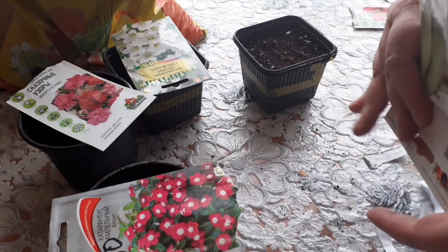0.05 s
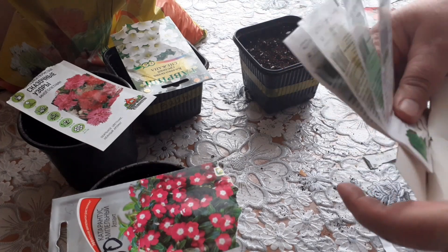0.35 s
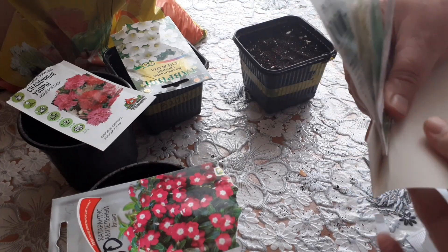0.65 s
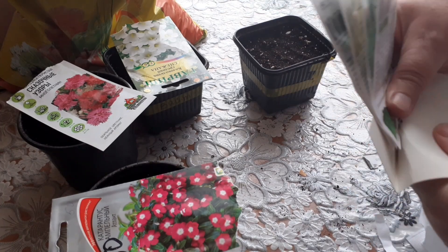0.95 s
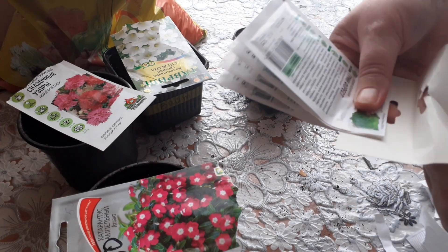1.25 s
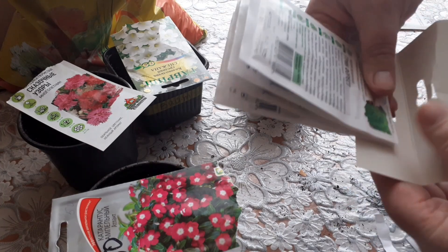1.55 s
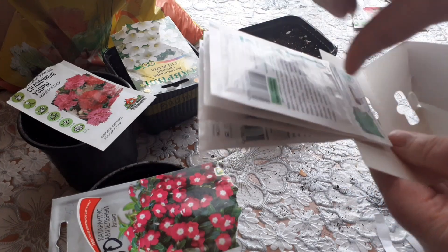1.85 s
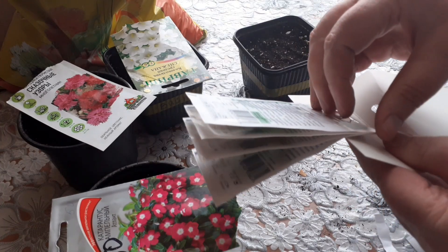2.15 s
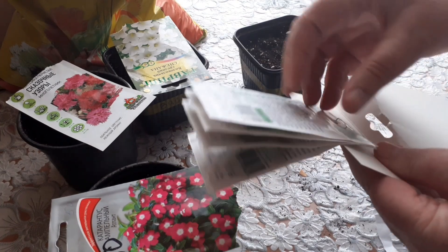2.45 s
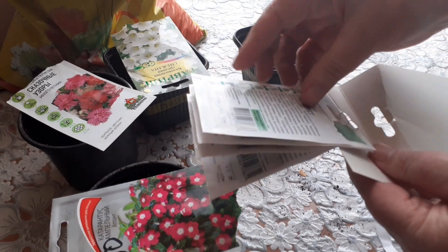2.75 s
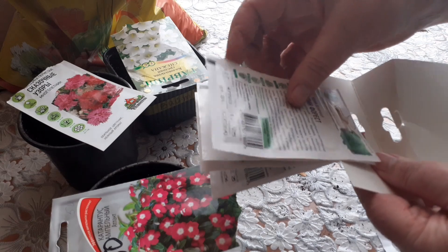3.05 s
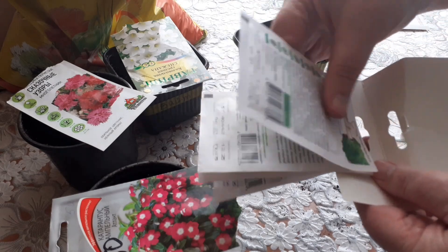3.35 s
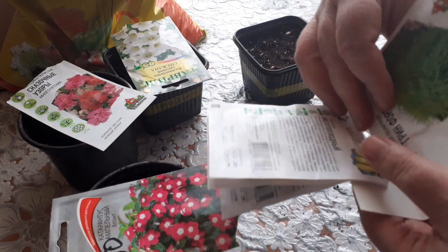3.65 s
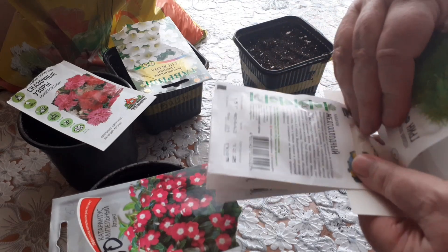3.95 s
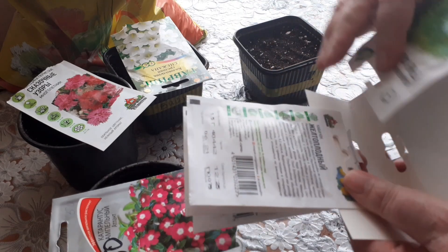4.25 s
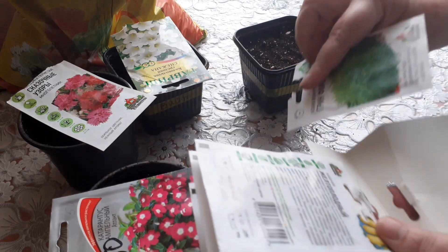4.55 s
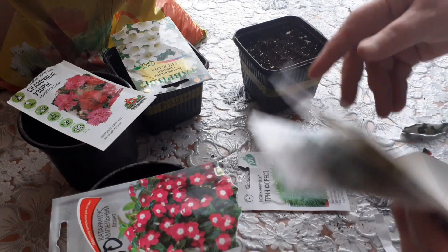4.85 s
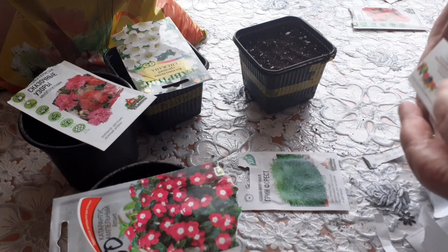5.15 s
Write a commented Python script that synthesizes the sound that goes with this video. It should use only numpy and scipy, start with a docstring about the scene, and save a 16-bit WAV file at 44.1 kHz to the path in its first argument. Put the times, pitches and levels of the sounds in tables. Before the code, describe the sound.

Paper seed packets are handled close to a stereo microphone over a table in a small room. They scuff and crackle from the start, and their stiff card sleeve pops at about 0.3 seconds, skips on its edge in a quick fading row of ticks, and snaps sharply at 0.5. A loud double crack comes at 1.1 seconds. From there to about 3 seconds the leafing is quiet, with faint sliding, small wrinkle ticks and a light snap near 2.4. Crackling and rustling thicken from 3 seconds, peaking around 3.5, and a strong scuff with a card knock lands just after 4. A faint low drone swells and sinks around that moment. Softer brushes and a few ticks continue until the end at about 5.3 seconds. The sharper sounds ring briefly off the near walls, over very faint room air.

```python
"""Paper slides and scuffs close to a stereo microphone: seed packets, handled over a table in a small room.
A stack is worked out of its card sleeve and leafed through. Fibres catch and hiss, wrinkles tick,
creases snap, and the stiff card pops, knocks and skips along on its edge. The table with its plastic
pots and the near walls ring briefly; behind them lie faint room air and a low drone that swells once."""
import sys
import numpy as np
from scipy import signal
from scipy.fft import rfft, irfft, next_fast_len
from scipy.io import wavfile
from scipy.ndimage import map_coordinates

SR = 44100
rng = np.random.default_rng(int(sys.argv[2]) if len(sys.argv) > 2 else 0)


def file_out(sig):
    """Save sig as 16-bit WAV at sys.argv[1]."""
    # one column per channel
    cols = np.atleast_2d(sig).T
    # limit, then scale
    lim = np.clip(cols, -1, 1)
    pcm = np.round(lim * 32767).astype(np.int16)
    wavfile.write(sys.argv[1], SR, pcm)


N = 233553


def amp(db):
    """Decibels to gain."""
    return 10 ** (np.asarray(db) / 20)


def unit(x):
    """Scaled to rms 1."""
    return x / np.sqrt(np.mean(x ** 2) + 1e-20)


def along(points, hz):
    """Interpolate (freq_hz, value) points on a log axis."""
    f, v = np.transpose(points)
    return np.interp(np.log(hz + 1), np.log(f + 1), v)


def hump(hz, centre_hz, octaves):
    """A resonance of height 1."""
    return np.exp(-(np.log2((hz + 1) / centre_hz) / octaves) ** 2)


def wobble(rate, size):
    """A smooth random curve, rate knots a second."""
    knots = rng.standard_normal(int(size * rate / SR) + 4)
    return map_coordinates(knots, [np.arange(size) * rate / SR])


def filtered(x, response):
    """Shape x by a gain that depends on frequency."""
    size = x.shape[-1]
    m = next_fast_len(size + 4096)
    return irfft(rfft(x, m) * response(np.fft.rfftfreq(m, 1 / SR)), m)[..., :size]


def ring(hz, t60):
    """One damped mode, falling 60 dB in t60 seconds."""
    t = np.arange(SR // 2) / SR
    return np.sin(2 * np.pi * hz * t) * amp(-60 * t / t60)


def place(sound, left_db):
    """Make a sound left_db louder at the left microphone than at the right."""
    return sound * amp([[left_db / 2], [-left_db / 2]])


def add(track, sound, start_s):
    """Mix a sound into the track from start_s on."""
    start = round(start_s * SR)
    part = sound[..., max(-start, 0):N - start]
    track[..., max(start, 0):max(start, 0) + part.shape[-1]] += part


# How alike the left and right microphones sound: freq_hz, correlation
MIC_LIKENESS = [(300, 0.89), (800, 0.47), (2000, 0.11), (4000, 0), (9000, .1), (14000, 0.055)]
def noise(colour, size):
    """Stereo noise of rms 1 with a colour in dB; the microphones share most of its bass."""
    def mid_side_gains(hz):
        angle = np.arccos(along(MIC_LIKENESS, hz)) / 2
        return amp(colour(hz)) * [np.cos(angle), np.sin(angle)]
    mid, side = filtered(rng.standard_normal((2, size)), mid_side_gains)
    return unit(np.array([mid + side, mid - side]))


def catching(size, grain_db, clump_db):
    """Paper fibres catch and let go: tiny grains that come in clumps."""
    return unit(amp(grain_db * wobble(1100, size) + clump_db * wobble(120, size)))


# Rubbed paper, heard close up: freq_hz, level_db
FRICTION_COLOUR = [(50, -24), (130, -6.5), (200, -6), (350, 7.5), (800, 3.5), (2000, 4), (4000, 4),
                   (6500, 3), (9000, 2.5), (13000, 1), (16000, -2.5)]
# Sheets sliding under the fingers, over the table: time_s, level_db
SLIDE_LEVELS = [(0.0, -46.5), (0.43, -53), (0.71, -63.5), (1.47, -71.5), (1.56, -62.5), (2.02, -82.5),
                (2.42, -82.5), (2.55, -63), (2.96, -76), (3.14, -63.5), (3.27, -58), (3.41, -52.5),
                (3.75, -58.5), (3.98, -51), (4.31, -65.5), (4.5, -68), (4.85, -66), (5.3, -55)]
def sliding(slide_db):
    """Sheets creep over each other with a fine hiss; finger pressure adds a lower rub."""
    def friction(tone):
        return noise(lambda hz: along(FRICTION_COLOUR, hz) + along(tone, hz), N)
    hiss = amp(-2.5) * friction([(700, -22.5), (2800, 2.5)])
    rub = amp(-7.5) * friction([(1500, -3.0), (3500, -15.5)])
    return amp(slide_db) * (hiss + rub) * catching(N, grain_db=1.0, clump_db=4.5)


# The air of the small room: freq_hz, level_db
AIR_COLOUR = [(18, -60), (30, -25.5), (161, -10), (184, -5.5), (287, -3), (426, -17.5), (780, -16),
              (1000, -24.5), (1590, -24), (5040, -34), (13700, -27), (16000, -33)]
def room_tone(crest_s=4.06, half_width_s=0.69, swell_db=18):
    """Faint air behind the paper, and a low drone that swells once and sinks back."""
    drone_colour = [(120, -34), (200, -10.5), (300, 2.5), (380, -10.5), (600, -40.5), (2000, -77)]
    drone = noise(lambda hz: along(drone_colour, hz), N)
    air = noise(lambda hz: along(AIR_COLOUR, hz), N)
    swell = np.exp(-((np.arange(N) / SR - crest_s) / half_width_s) ** 2)
    return amp(-72.5) * air + amp(-78.5 + swell_db * swell) * drone


# Quick strokes of sheet over sheet, close to the microphones:
# crest_s, level_db, length_s, tilt_db_per_octave, sheet_hz, left_db
SHEET_STROKES = [(0.002, -31.5, 0.014, -2, 703, 1.5), (0.121, -46, 0.18, -1.5, 2200, 1),
                 (0.253, -30, 0.014, -4.5, 500, -3.5), (0.279, -21.5, 0.023, -5.5, 1509, 1),
                 (0.476, -30.5, 0.022, -2, 2063, -4), (0.561, -38.5, 0.074, -.5, 2060, -0.5),
                 (0.743, -39, 0.017, -2.5, 1040, -1), (0.87, -51.5, 0.036, -2, 398, -3.5),
                 (1.075, -51, 0.071, -1, 12800, 2), (1.415, -56, 0.052, -1.5, 740, -1.5),
                 (1.48, -55, 0.027, 1, 654, -1.5), (1.675, -56, 0.059, -0.5, 640, -0.5),
                 (1.962, -47.5, 0.021, -1, 9050, -2), (2.419, -38, 0.011, -0.5, 1760, 3),
                 (2.572, -50, 0.017, -3.5, 1950, -2), (2.932, -48, 0.032, 2, 6230, 1.5),
                 (3.088, -41, 0.032, -1, 6950, -3), (3.287, -38.5, 0.032, -0.5, 1520, -5),
                 (3.338, -39, 0.026, -1.5, 8200, 1), (3.449, -31, 0.018, 0, 8600, -4),
                 (3.495, -29, 0.029, -1, 4200, -1), (3.729, -40, 0.02, 1.5, 3550, 1),
                 (3.796, -43.5, .028, -2, 8000, 2.5), (3.951, -36, 0.032, -.5, 1408, -1),
                 (4.005, -38.5, 0.056, 1.5, 1780, -0.5), (4.042, -23, 0.022, -0.5, 1300, 7.5),
                 (4.056, -20, 0.012, 0, 1744, -0.5), (4.172, -45, .014, -0.5, 4040, -2.5),
                 (4.664, -42.5, 0.019, 0, 610, 0), (4.741, -38, 0.011, 1, 8500, 2),
                 (4.796, -40.5, 0.036, 0.9, 2300, 2), (4.824, -40, .034, 1.2, 3540, 0.5),
                 (5.043, -45.5, 0.054, -0.9, 1410, 0), (5.29, -44, 0.028, -1, 5400, -5.5)]
def scuffs(rise_share=0.4):
    """Each stroke swells and dies in its sheet's resonance and stirs the sleeve; pressing darkens it."""
    out, t = np.zeros((2, N)), np.arange(-SR // 8, SR // 4) / SR
    for crest_s, db, length_s, tilt, sheet_hz, left_db in SHEET_STROKES:
        def colour(hz):
            friction = along(FRICTION_COLOUR, hz) + tilt * np.log2(np.maximum(hz, 400))
            sheet = 5 * hump(hz, sheet_hz, octaves=0.36)
            sleeve = 3 * hump(hz, centre_hz=290, octaves=0.36)
            return friction + sheet + sleeve
        rasp = noise(colour, len(t)) * catching(len(t), grain_db=3.0, clump_db=1.5)
        swell = np.exp(-np.abs(t) / (length_s * np.where(t < 0, rise_share, 1 - rise_share)))
        add(out, place(amp(db) * swell * rasp, left_db), crest_s + t[0])
    return out


CRACK_RISE_S = 0.00065
def crack(colour, t60):
    """A noise burst with a sudden rise and a quick end."""
    t = np.arange(SR // 16) / SR
    shape = amp(-60 * t / t60) * (1 - np.exp(-t / CRACK_RISE_S))
    return unit(shape * noise(colour, len(t))) * np.sqrt(np.mean(shape ** 2))


# A wrinkle or crease giving way, heard close up: freq_hz, level_db
CREASE_COLOUR = [(60, -28.5), (200, -13.5), (400, 2.5), (900, 4.5), (2200, 4), (4000, 2), (7000, 3),
                 (12000, 2.5), (16000, -4)]
def crinkle(slide_db, ticks_per_s=22, above_slide_db=7.5, spread_db=12.5):
    """Small wrinkles tick at random while the sheets move, most faint and a few clear."""
    out = np.zeros((2, N))
    for when, size, pitch, side in rng.uniform(size=(int(ticks_per_s * N / SR), 4)):
        pitch_hz = 1500 * 8 ** pitch
        colour = lambda hz: along(CREASE_COLOUR, hz) + 9 * hump(hz, pitch_hz, octaves=0.86)
        db = slide_db[int(when * (N - 1))] + above_slide_db + spread_db * size ** 2
        tick = amp(db) * crack(colour, t60=0.0024)
        add(out, place(tick, left_db=8 * (side - 0.5)), when * N / SR)
    return out


# Creases snapping near the microphones; body and sizzle are relative to the midrange:
# start_s, level_db, body_db, sizzle_db, left_db
CREASE_SNAPS = [(0.0644, -26.5, -15, -4, -4), (0.0897, -16, -11, 5, -4), (0.1432, -31.5, -13, -15, -2),
                (0.4771, -9.5, 5, -11.5, -2.5), (0.4957, -20, -11, -10, 2), (0.578, -27.5, 2, -20, -4),
                (0.9738, -38, -19, -18, -9), (1.0142, -34.5, -8, -7.5, 1), (1.1053, -11.5, 4, 3, 2.5),
                (1.1276, -7, 5, -6, 1), (1.3633, -39.5, -22, -13, -1.5), (1.555, -40.5, -5.5, -12, -2),
                (1.6163, -37.5, 6, -7, -2), (1.7189, -36.5, -13, -8, 0), (1.7399, -38.5, -20, 0, 2.5),
                (1.953, -35, -14.5, 12, 4), (2.3835, -30, 9.5, 6, -0.5), (2.4145, -32.5, 13, -2.5, 4),
                (2.5661, -38, 5, 6, 1.5), (3.0363, -33.5, -2, 3, 0), (3.0763, -30, 19, 5, -2.5),
                (3.0817, -19, -16, 7.5, 4), (3.098, -28, -40, -11, 4), (3.1746, -33, -14, -7.5, -1),
                (3.2323, -24.5, 7, 6, -2.5), (3.262, -25.5, -19, 1, 8), (3.2922, -26.5, -15, 6, 9),
                (3.3957, -36.5, 5, 1, -8), (3.4173, -35, 3, 5, 5), (3.4417, -16, 4, 7, 7.5),
                (3.461, -27.5, -17, -3, -20), (3.4684, -25, -3, 9, -1), (3.4845, -16, 3, -1.5, 12),
                (3.4955, -11.5, -8, 0.5, 5), (3.5046, -22.5, 4, -8, 10), (3.5513, -23, 8.5, 1, 3),
                (3.578, -26, 1.5, -13, 8.5), (3.6076, -26, -7, -1, 1), (3.7329, -29.5, 9.5, 2.5, -1),
                (3.8668, -34, 7, 2.5, -1.5), (3.915, -27, 1, 3.5, -2.5), (3.9454, -28, 10.5, -15, 10),
                (3.987, -33, 3.5, -15, -10.5), (3.9935, -21.5, -0.5, 2, -6.5), (4.0017, -28, 7, 6, 0),
                (4.0432, -19.5, 19.5, -12.5, 18), (4.0594, -18.5, -4, 0, 0), (4.2588, -38, 1, 8, -2.5),
                (4.368, -31, -9.5, 3, -0.5), (4.5778, -43.5, -11.5, 11.5, -2.5),
                (5.1807, -33.5, 4, -5, 1.5)]
def snaps():
    """Creases give way, some with body and some with sizzle, and each facet has a pitch of its own."""
    out = np.zeros((2, N))
    facets_hz = 3600 * np.exp(0.45 * rng.standard_normal(len(CREASE_SNAPS)))
    for (start_s, db, body_db, sizzle_db, left_db), facet_hz in zip(CREASE_SNAPS, facets_hz):
        tone = [(70, body_db - 17), (200, body_db - 6.5), (650, body_db), (2400, 0), (11000, sizzle_db)]
        def colour(hz):
            return along(CREASE_COLOUR, hz) + along(tone, hz) + 5 * hump(hz, facet_hz, octaves=0.1)
        snap = amp(db) * crack(colour, t60=0.011)
        add(out, place(snap, left_db), start_s + CRACK_RISE_S)
    return out


# Loose packets settling: freq_hz, level_db
FLUTTER_COLOUR = [(100, -13.5), (240, -18), (380, -0.5), (620, 2), (1000, -10), (2200, -5.5), (4000, -13),
                  (9000, -25.5), (15000, -28)]
# Stiff card popping through or knocking, close and central:
# start_s, panel_db, panel_hz, panel_t60_s, sway_db, sway_hz, flutter_db
CARD_POPS = [(0.2845, -6, 760, 0.0085, -16, 327, -43), (0.2955, -17, 523, .008, -29, 276, -57),
             (0.4803, -17.5, 623.6, 0.035, -36.5, 376, -43.5), (0.7414, -41.5, 980, 0.021, -48, 385, -58.5),
             (0.885, -46, 633, .015, -47.5, 328, -69.5), (1.1062, -26.5, 720, 0.022, -49, 420, -53),
             (1.1285, -9, 2980, 0.0067, -30, 333, -26), (1.476, -45.5, 577, .015, -47.5, 302, -61.5),
             (2.3843, -40.5, 1760, 0.021, -62.5, 299, -47.5), (3.4957, -40, 694, 0.0083, -44.5, 340, -55),
             (4.0439, -7.5, 1335, 0.0079, -31, 341, -61.5)]
def card_pops():
    """A panel flips, the sleeve sways, the hand thuds and the loose packets flutter to rest."""
    out, t = np.zeros((2, N)), np.arange(SR // 2) / SR
    thud = amp(-11) * ring(hz=121, t60=0.08)
    settling = amp(-60 * t / 0.26) * (1 - np.exp(-t / 0.0098))
    for start_s, panel_db, panel_hz, t60, sway_db, sway_hz, flutter_db in CARD_POPS:
        panel = amp(panel_db) * (ring(panel_hz, t60) - 0.52 * ring(1.55 * panel_hz, t60))
        sway = amp(sway_db) * (ring(sway_hz, t60=0.073) + thud)
        flutter = amp(flutter_db) * settling * noise(lambda hz: along(FLUTTER_COLOUR, hz), len(t))
        add(out, panel + sway + flutter, start_s)
    return out


# One tick of the card's edge, heard close up: freq_hz, level_db
EDGE_COLOUR = [(100, -10.5), (400, 7), (1300, 5.5), (3000, -7.5), (8000, -12.5), (12000, -22.5)]
def edge_skips(start_s=0.336, first_gap_s=0.0102, slowing=1.06, first_db=-29, loss_db=0.95):
    """The card's edge catches and slips in a slowing, fading row of ticks."""
    out = np.zeros((2, N))
    for k in range(9):
        tick = crack(lambda hz: along(EDGE_COLOUR, hz), t60=0.019)
        add(out, amp(first_db - loss_db * k) * tick, start_s)
        start_s += first_gap_s * slowing ** k
    return out


# Echo off the near walls: freq_hz, level_db
WALL_COLOUR = [(70, -13.5), (115, -2), (200, -9.5), (400, 0.5), (800, -2.5), (1300, -1), (2000, 2.5),
               (5000, 0.5), (15000, 3.5)]
# Decay of the small room: freq_hz, t60_s
ROOM_DECAY = [(100, 0.25), (400, 0.36), (1500, 0.25), (4000, 0.21), (9000, 0.18), (16000, 0.15)]
# Modes of the table and plastic pots below the hands: pitch_hz, level_db, t60_s
TABLE_MODES = [(110.96, -11, 0.19), (294, -12.5, 0.37), (341, -5, 0.42), (394, -8, 0.21),
               (502.4, -11.5, 0.08), (547.4, -7, 0.17), (635, 2, 0.28), (740, -8, 0.28), (1138, -4, 0.069),
               (1480, -10.5, 0.13), (1873, -3, 0.21), (2004, -3.5, 0.097)]
def walls_and_table(paper, walls_db=-8.0, table_db=-55.5):
    """Near walls answer the paper with a short tail; the table and its pots ring along."""
    size = SR // 2
    echo = noise(lambda hz: along(WALL_COLOUR, hz), size)
    hz, t, bands = signal.stft(echo, SR, nperseg=256)
    decay = amp(-60 * t / along(ROOM_DECAY, hz)[:, None])
    tail = signal.istft(bands * decay, SR, nperseg=256)[1][:, :size]
    tail *= np.clip((np.arange(size) / SR - 0.002) / 0.0046, 0, 1)  # the first echoes need a few ms
    modes = sum(amp(db) * ring(pitch_hz, t60) for pitch_hz, db, t60 in TABLE_MODES)
    answer = amp(walls_db) * tail / np.linalg.norm(tail[0]) + amp(table_db) * modes
    return signal.fftconvolve(paper, answer, axes=1)[:, :N]


def scene():
    """Paper and card up close, the table and walls around them, room tone behind."""
    slide_db = np.interp(np.arange(N) / SR, *np.transpose(SLIDE_LEVELS))
    paper = sliding(slide_db) + scuffs() + snaps() + crinkle(slide_db) + card_pops() + edge_skips()
    return paper + walls_and_table(paper) + room_tone()


# Level of the left microphone over the right: freq_hz, left_db
MIC_BALANCE = [(100, -8), (320, -9.5), (650, -8), (1300, -2), (4000, -3.5), (8000, -3), (14000, 4)]
def record(dry, bottom_hz=70, top_hz=16300):
    """The microphones shed deep bass and the very top, and lean right except in the high treble."""
    thinned = signal.sosfilt(signal.butter(4, bottom_hz, "highpass", fs=SR, output="sos"), dry)
    def response(hz):
        balance = amp(np.outer([0.5, -0.5], along(MIC_BALANCE, hz)))
        return balance / (1 + (hz / top_hz) ** 120)
    return filtered(thinned, response)


dry = scene()
out = record(dry)
file_out(out)
```